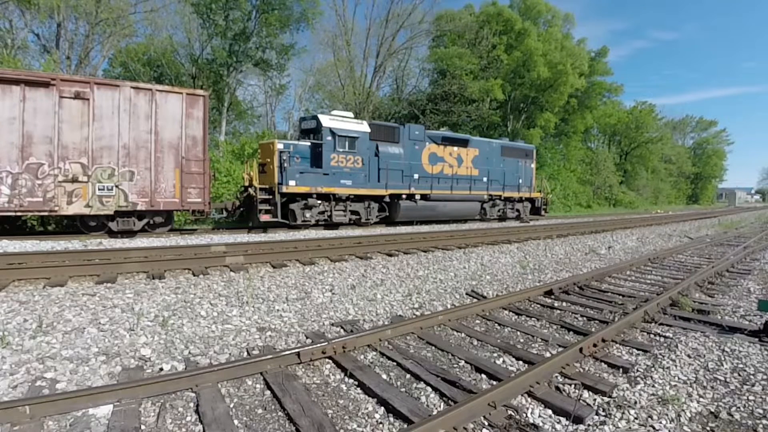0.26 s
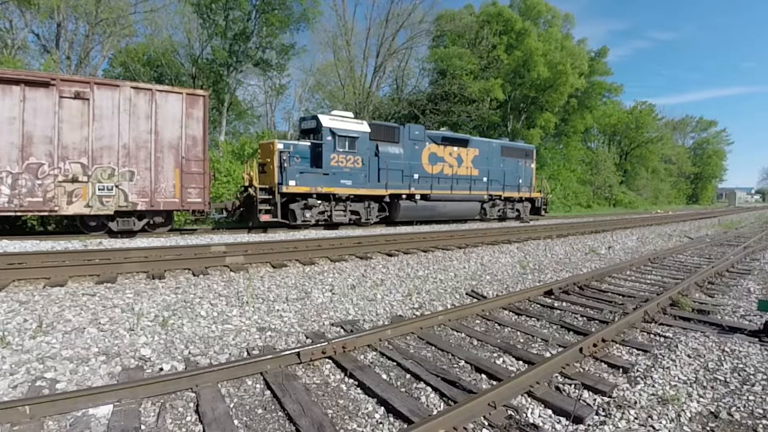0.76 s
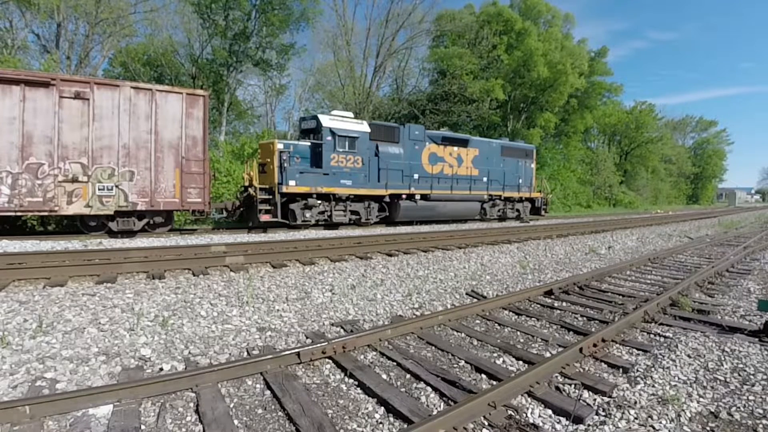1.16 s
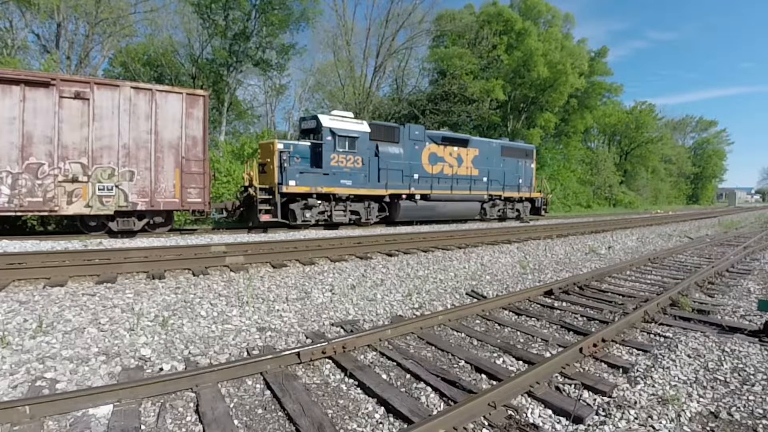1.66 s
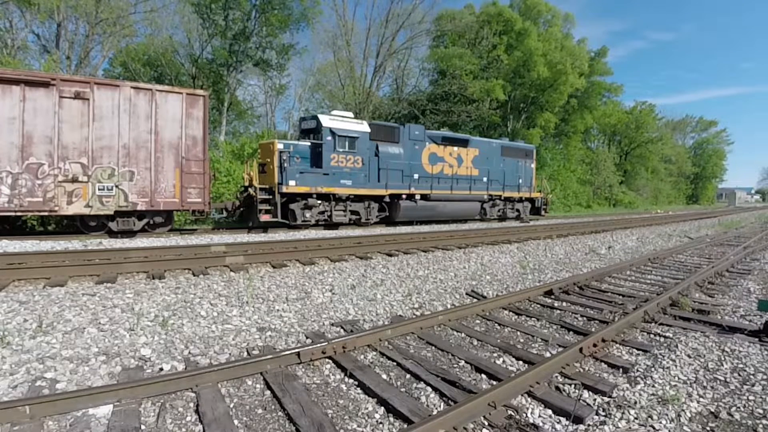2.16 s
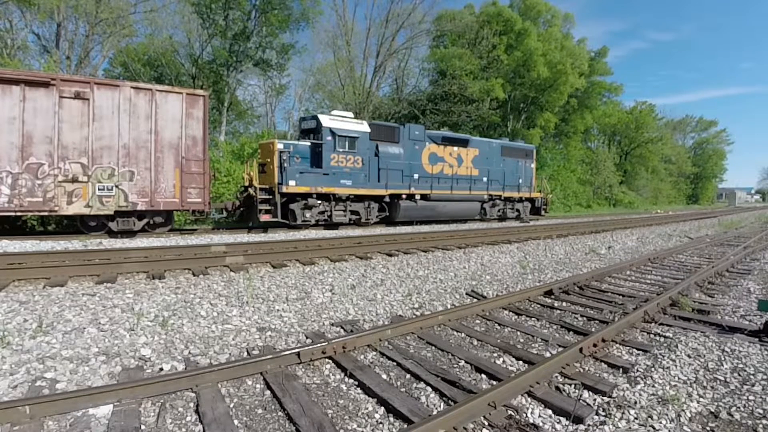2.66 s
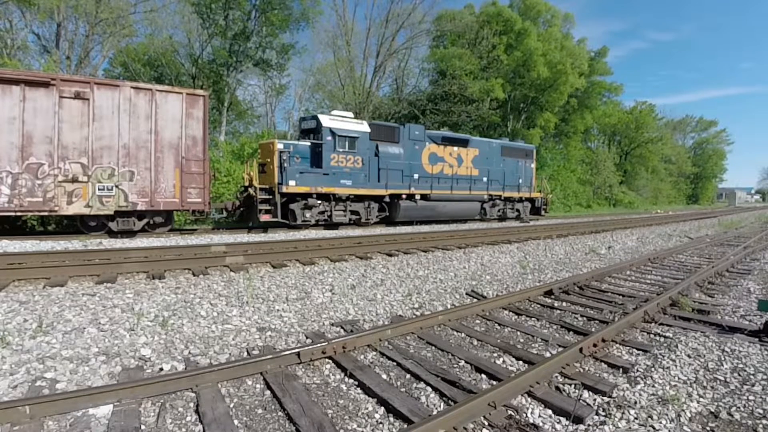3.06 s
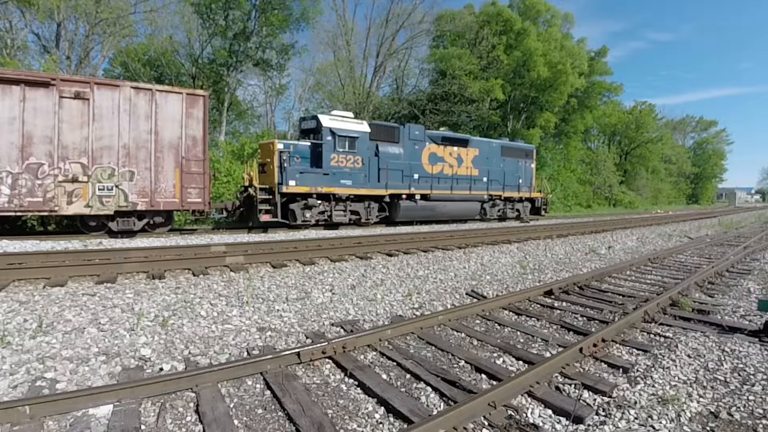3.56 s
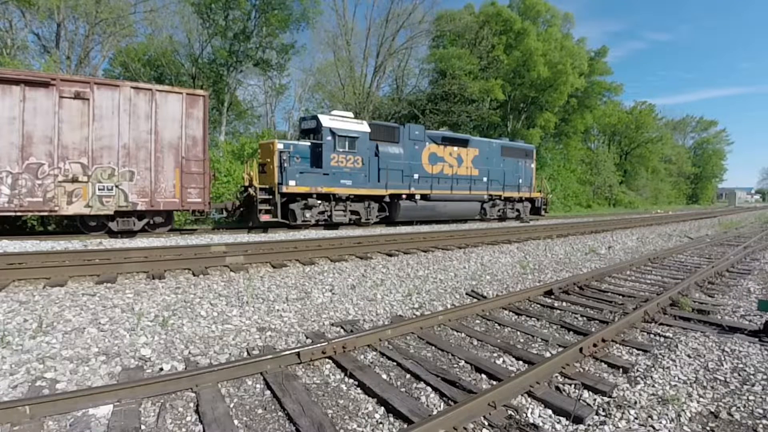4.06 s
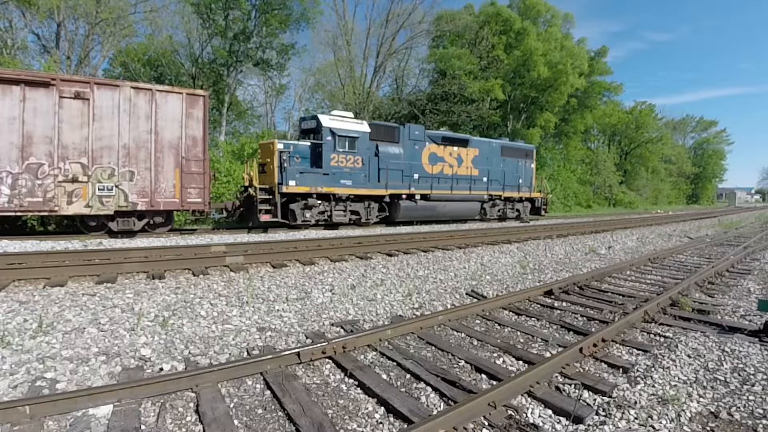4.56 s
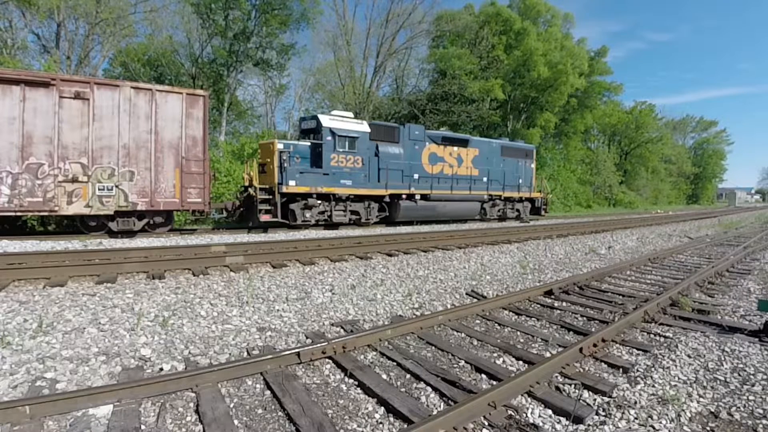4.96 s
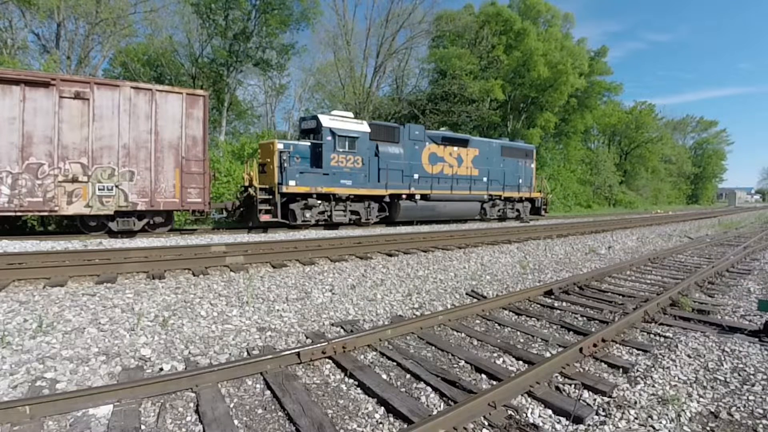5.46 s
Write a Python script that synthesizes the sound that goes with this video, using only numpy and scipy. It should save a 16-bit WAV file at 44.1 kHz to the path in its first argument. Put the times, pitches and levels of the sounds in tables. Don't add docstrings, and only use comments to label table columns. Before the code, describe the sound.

Continuous idle of a heavy diesel engine beside a track, heard from a moderate distance on a small stereo camera microphone. Deep rumbling pulses, hollow knocking and fine clatter turn over quickly and evenly, with a thin constant whine and broad air roar above. Tiny high hisses tick along with the engine. A click and knock come in the first second, and low wind buffets are strongest in the second half.

```python
import sys
import numpy as np
from scipy import signal
from scipy.fft import rfft, irfft
from scipy.io import wavfile
from scipy.ndimage import uniform_filter1d, map_coordinates

SR = 44100
rng = np.random.default_rng(int(sys.argv[2]) if len(sys.argv) > 2 else 0)


def file_out(sig):
    cols = np.atleast_2d(sig).T
    lim = np.clip(cols, -1, 1)
    pcm = np.round(lim * 32767).astype(np.int16)
    wavfile.write(sys.argv[1], SR, pcm)


def attenuation_scalar(level_db):
    decades = np.asarray(level_db, float) / 20
    return 10 ** decades


N = 251811
HZ = np.fft.rfftfreq(N, 1 / SR)
T = np.arange(N) / SR

# time_s, whine_hz
GEAR_SPEED = [(0, 1126.13), (.7, 1125.65), (1.4, 1126.88), (2.1, 1125.81), (3.2, 1125.58), (3.8, 1126.7),
              (4.6, 1126.2), (5.2, 1124.85), (5.71, 1125.65)]
WHINE_TEETH = 237
START_TURN, IDLE_HZ = -.57304, 4.7512
# crank_angle_turns, long_stack_push_db, short_stack_push_db
CYLINDERS = [(0.0415, -39.3, -61.8), (0.1232, -48.9, -50.4), (0.1608, -36.0, -44.7), (0.19, -72.5, -43.4),
             (0.2908, -34.1, -46.1), (0.3588, -41.3, -41.4), (0.4285, -48.4, -44.8), (0.4823, -43.9, -52.4),
             (0.5466, -32.2, -45.8), (0.6214, -29.1, -75.0), (0.6715, -30.6, -46.2), (0.7386, -75.0, -50.3),
             (0.8442, -75.0, -38.0), (0.8662, -75.0, -35.8), (0.9029, -45.0, -73.9), (0.9937, -45.2, -57.6)]
# pitch_hz, width_hz
STACKS = [(39.7, 8), (97.2, 21.9)]
# crank_angle_turns, pitch_hz, level_db, t60_s
PISTON_SLAPS = [(0.0181, 481.3, -33.4, 0.45), (0.1041, 433.1, -22.7, 0.04), (0.1219, 290.7, -35.8, 0.45),
                (0.1491, 440.6, -24.3, 0.296), (0.2034, 346.1, -32.0, 0.212), (0.2782, 491.9, -25.4, 0.042),
                (0.2825, 182.8, -36.5, 0.45), (0.2973, 423.3, -36.2, 0.45), (0.4659, 462.1, -30.7, 0.341),
                (0.476, 217.6, -26.9, 0.247), (0.5513, 441.7, -25.4, 0.315), (0.6208, 290.1, -33.7, 0.296),
                (0.6233, 315.4, -36.1, 0.45), (0.6729, 425.4, -24.4, 0.047), (0.7381, 340.2, -28.7, 0.377),
                (0.7572, 454.7, -21.0, 0.042), (0.7678, 191.7, -30.3, 0.42), (0.7735, 232.2, -29.7, 0.444),
                (0.8162, 413.3, -27.9, 0.072), (0.8674, 274.8, -30.7, 0.254), (0.8757, 506.0, -34.5, 0.192),
                (0.8929, 322.4, -35.6, 0.45)]
# crank_angle_turns, pitch_hz, level_db, t60_s
VALVE_TAPS = [(0.0841, 768.6, -33.4, 0.21), (0.1239, 730.6, -36.4, 0.45), (0.132, 988.0, -34.2, 0.088),
              (0.1658, 881.4, -37.4, 0.227), (0.1866, 615.2, -28.6, 0.06), (0.2423, 1048.2, -35.3, 0.142),
              (0.3234, 651.0, -25.1, 0.075), (0.3437, 552.3, -32.5, 0.395), (0.3437, 1004.6, -33.0, 0.05),
              (0.3453, 1123.3, -39.6, 0.45), (0.3769, 609.2, -31.0, 0.119), (0.4088, 532.1, -37.2, 0.291),
              (0.4208, 695.2, -35.9, 0.437), (0.4367, 800.5, -32.3, 0.13), (0.441, 852.4, -39.5, 0.444),
              (0.5438, 920.2, -35.0, 0.068), (0.5545, 624.0, -27.1, 0.043), (0.5889, 781.3, -32.6, 0.11),
              (0.6718, 609.2, -34.9, 0.236), (0.6885, 729.2, -28.8, 0.45), (0.7131, 913.2, -32.4, 0.117),
              (0.7809, 1114.4, -42.6, 0.449), (0.8631, 702.1, -32.4, 0.188), (0.9289, 525.1, -30.0, 0.164),
              (0.9697, 635.1, -30.1, 0.04), (0.9704, 924.7, -37.1, 0.102)]
# teeth_per_turn, level_db (rms), tooth_position (0-1)
PUMP_GEARS = [(79, -38.6, .46), (138, -50, .18), (147, -38.1, .51), (154, -36.1, .31), (158, -42.4, .41)]
# pitch_hz, level_db (rms per shaft order)
CLATTER = [(150, -58), (300, -65), (500, -65), (800, -63), (1080, -64), (1200, -67), (1600, -73),
           (1800, -82), (2200, -78), (3000, -92)]
MESH_TEETH = [237, 316, 339, 395, 474]
MESH_DB = [-36.5, -45.5, -52.5, -55.5, -61]
PINION_TEETH = [884, 1081, 1276.5, 1376.5]
PINION_DB = [-76, -80, -81, -85]
# pitch_hz, width_hz, level_db (rms)
SINGING_GEARS = [(4437, 50, -64.5), (5604, 8, -66), (5622, 6, -74), (5655, 5, -72), (5812, 8, -79)]
BLOWER_RATIO, BLOWER_START = 79 / 30, .69
BLOWER_LOBES = [2, 4, 6, 9, 18, 24, 36, 42, 51, 66]
BLOWER_DB = [-46.5, -43.5, -34, -37, -53, -61, -71.5, -53, -53.5, -67]
FAN_RATIO, FAN_START = 12.1555, .475
# pitch_hz, level_db (per Hz)
LOW_RUSH = [(20, -46), (60, -64), (110, -55.5), (180, -68.5), (300, -63.5), (420, -61), (560, -65),
            (750, -66), (1100, -69.5), (1550, -72.5), (1780, -77), (2050, -70), (2500, -78), (2900, -83.5)]
# pitch_hz, level_db (per Hz)
HIGH_RUSH = [(2900, -85), (3400, -82), (4300, -91), (5200, -91.5), (6000, -95.5), (6800, -99.5),
             (8500, -100), (11000, -104.6), (14000, -110), (16000, -116)]
# time_s, level_db
LEAK_PRESSURE = [
    (0, -1.5),
    (1.8, -0.5),
    (2.2, -3),
    (3.0, -3),
    (3.4, -0.5),
    (4.7, -2),
    (5.6, 0.5),
]
WHISTLE_DB, HISS_DB = -56, -54.5
HISS_SLOPE = 1.3
PUFF_SCATTER_DB = .8
# centre_s, peak_db (rms), length_s
GUSTS = [
    (0.296, -33, .15),
    (2.106, -33.5, 0.55),
    (2.726, -27.5, .2),
    (3.344, -21.5, 0.39),
    (4.048, -22, .15),
    (4.742, -18.5, .12),
]
BREEZE_DB, EDDY_DB = -28.5, -21
# start_s, peak_db, ring_hz, thump_db
CAMERA_TICKS = [
    (.3157, -57, 9430, -60),
    (.6574, -52, 10700, -40),
    (.6575, -54, 8300, -60),
    (.761, -58, 11000, -60),
    (.8243, -35, 11200, -15),
    (.8244, -46, 14600, -60),
    (.8246, -44, 3750, -60),
]
TICKS_DB = 1.5
# pitch_hz, left_minus_right_db
PORT_BALANCE = [(400, 0), (750, .8), (1190, 3), (1870, -1.5), (2400, -1.5), (2950, 1.2), (4600, -1),
                (5800, 1.5), (8000, 0)]
# pitch_hz, likeness (0-1)
PORT_LIKENESS = [(200, 1), (700, .985), (1200, .97), (1900, .82), (3000, .68), (6000, .62), (9000, .44),
                 (12000, .3), (15000, .1)]
PORT_LAG_S = 2.5e-5
DUCK_DB = -12
# pitch_hz, level_db (rms)
CLOCK_TONES = [(4000, -78), (6000, -89), (7000, -89), (8000, -92), (10000, -86), (12000, -90)]


def on_log(table, hz):
    f, v = np.transpose(table)
    return np.interp(np.log(hz + 1e-9), np.log(f), v)


def walk(rate):
    hold = int(SR / rate)
    held = np.repeat(rng.standard_normal(N // hold + 1), hold)
    return 0.83 * uniform_filter1d(uniform_filter1d(held, hold), hold)[:N]


def resonance(hz, pitch, width):
    return 1j * hz * width / (pitch ** 2 - hz ** 2 + 1j * hz * width)


def band(pitch, width):
    return resonance(HZ, pitch, width)


def noise(gain):
    x = irfft(rfft(rng.standard_normal(N)) * gain, N)
    return x / x.std()


def tones(cycles, multiples, dbs, starts=0):
    out = 0
    for m, db, start in np.broadcast(multiples, dbs, starts):
        out = out + np.sqrt(2) * attenuation_scalar(db) * np.sin(2 * np.pi * (m * cycles + start))
    return out


def played(orders, turn, size=4096):
    one_turn = irfft(orders, size) * size
    return map_coordinates(one_turn, [turn % 1 * size], order=3, mode="grid-wrap")


def engine(turn):
    order = np.arange(2049)
    hz = order * IDLE_HZ
    angle, long_db, short_db = np.transpose(CYLINDERS)
    late = np.exp(-2j * np.pi * order[:, None] * angle)
    long, short = (resonance(hz, pitch, width) for pitch, width in STACKS)
    exhaust = late @ attenuation_scalar(long_db) * long - late @ attenuation_scalar(short_db) * short
    exhaust = exhaust * (order > 3) * (order < 34)
    knocks = 0
    for at, pitch, db, t60 in PISTON_SLAPS + VALVE_TAPS:
        w = 2 * np.pi * pitch
        ring = w / ((2j * np.pi * hz + np.log(1000) / t60) ** 2 + w ** 2)
        knocks = knocks + attenuation_scalar(db) * IDLE_HZ * ring * np.exp(-2j * np.pi * order * at)
    chance = rng.standard_normal(2049) + 1j * rng.standard_normal(2049)
    clatter = attenuation_scalar(on_log(CLATTER, hz)) * chance / 2 * (order < 700)
    block = played((knocks + clatter) * (order >= 34), turn)
    block = block + tones(turn, *np.transpose(PUMP_GEARS))
    return played(exhaust, turn) * attenuation_scalar(.9 + .3 * walk(6)) + block * attenuation_scalar(.8 + .7 * walk(12))


def gears(turn):
    whine = tones(turn, MESH_TEETH, MESH_DB, .26) * attenuation_scalar(.4 * walk(5))
    out = whine + tones(turn, PINION_TEETH, PINION_DB)
    for pitch, width, db in SINGING_GEARS:
        out = out + attenuation_scalar(db + 1.1 * walk(25)) * noise(band(pitch, width))
    return out


def blower_and_fan(turn):
    blower = tones(BLOWER_RATIO * turn + BLOWER_START, BLOWER_LOBES, BLOWER_DB)
    fan = tones(FAN_RATIO * turn + FAN_START, [1, 2, 6], [-38.1, -40.1, -52.1])
    return blower - fan + tones(turn, 20.812, -54.5)


def rush(turn):
    white = rfft(rng.standard_normal(N)) * np.sqrt(SR / 2)
    coloured = white * attenuation_scalar(on_log(LOW_RUSH + HIGH_RUSH[1:], HZ)) * (HZ > 14)
    edges = 14 * 2 ** (np.arange(24) * .45)
    swell = walk(.7)
    out = 0
    for lo, hi in zip(edges, edges[1:]):
        flicker = attenuation_scalar(.5 * swell + 1.5 * walk(11))
        out = out + flicker * irfft(coloured * (HZ >= lo) * (HZ < hi), N)
    return out * attenuation_scalar(0.5 * np.cos(2 * np.pi * (8 * turn - .1)))


def jet(age, rise_s, fall_s):
    age = np.clip(age, 0, None)
    return (1 - np.exp(-age / rise_s)) * np.exp(-age / fall_s)


def puff(turn, db, late_s, rise_s, fall_s):
    shifted = turn + 1 - late_s * IDLE_HZ
    strength = attenuation_scalar(db[shifted.astype(int)]) * (shifted >= 1)
    return strength * jet(shifted % 1 / IDLE_HZ, rise_s, fall_s)


def valve(turn):
    opens_s = (np.arange(int(turn[-1]) + 3) - 1 - START_TURN) / IDLE_HZ
    pressure = np.interp(opens_s, *np.transpose(LEAK_PRESSURE))
    scatter = PUFF_SCATTER_DB * rng.standard_normal((len(opens_s), 2)).T
    whistle_db = WHISTLE_DB + pressure + scatter[0]
    hiss_db = HISS_DB + HISS_SLOPE * pressure + scatter[0] + scatter[1]
    whistle = puff(turn, whistle_db, 0, .002, .036)
    whistle = whistle + .3 * puff(turn, whistle_db, -.014, .003, .03)
    whistle = whistle + .3 * puff(turn, whistle_db, .133, .004, .03)
    hiss = puff(turn, hiss_db, -.013, .008, .035) + .3 * puff(turn, hiss_db, .14, .004, .02)
    grain = attenuation_scalar(1.5 * walk(150))
    whistle_band = band(8200, 1600) ** 2
    hiss_band = band(11000, 5000) ** 2 + .9 * band(6200, 2500) ** 2
    return grain * (whistle * noise(whistle_band) + hiss * noise(hiss_band))


def gusts():
    pressure = attenuation_scalar(BREEZE_DB)
    for centre, db, length in GUSTS:
        pressure = pressure + attenuation_scalar(db) * np.exp(-((T - centre) / length) ** 2 * 2)
    return pressure


def wind():
    shared = noise(band(3, 7) ** 3) * attenuation_scalar([[-.6], [.6]])
    eddies = attenuation_scalar(EDDY_DB) * noise(band(7, 9) * band(25, 70)) * np.array([[1], [-1]])
    return gusts() * (shared + eddies)


def ticks():
    out = np.zeros(N)
    for start, db, pitch, thump_db in CAMERA_TICKS:
        near = slice(int((start - .01) * SR), int((start + .01) * SR))
        age = np.clip(T[near] - start, 0, None)
        tip = T[near] - start - .0005
        swell = age / .0004 * np.exp(-age / .0004)
        out[near] += attenuation_scalar(db + 6) * swell * np.sin(2 * np.pi * pitch * age)
        out[near] += attenuation_scalar(thump_db) * np.exp(-np.abs(tip) / .00025) * np.cos(2 * np.pi * 1500 * tip)
    return out


def ports(x):
    half = attenuation_scalar(on_log(PORT_BALANCE, HZ) / 2) * np.exp(-1j * np.pi * HZ * PORT_LAG_S)
    like = np.clip(on_log(PORT_LIKENESS, HZ), 0, 1)
    tail = rng.standard_normal(9000) * np.exp(-np.arange(9000) / 4000)
    scattered = np.exp(1j * np.angle(rfft(tail, N))) * np.sqrt((1 - like) / 2)
    direct = np.sqrt((1 + like) / 2)
    left, right = (direct + scattered) * half, (direct - scattered) / half
    return irfft(rfft(x) * np.array([left, right]), N)


def scene():
    whine_hz = np.interp(T, *np.transpose(GEAR_SPEED))
    turn = np.cumsum(whine_hz) / WHINE_TEETH / SR + START_TURN
    locomotive = engine(turn) + gears(turn) + blower_and_fan(turn) + rush(turn) + valve(turn)
    camera_ticks = ticks() * attenuation_scalar(TICKS_DB) * attenuation_scalar([[1.5], [-1.5]])
    return ports(locomotive) + camera_ticks + wind()


def band_limit(x):
    return signal.sosfilt(signal.butter(12, 15720, fs=SR, output="sos"), x)


def record(dry):
    ducked = dry * attenuation_scalar(0.38 + DUCK_DB * gusts())
    mix = ducked + tones(T, *np.transpose(CLOCK_TONES))
    return band_limit(mix)


dry = scene()
out = record(dry)
file_out(out)
```